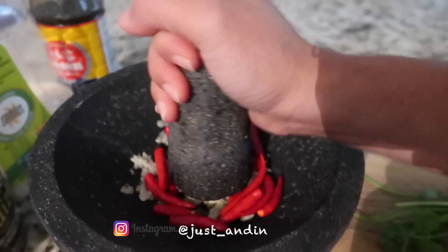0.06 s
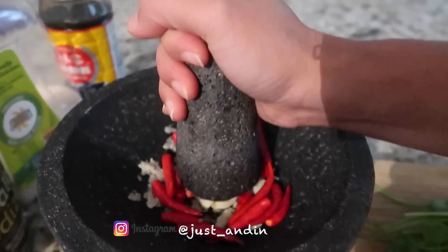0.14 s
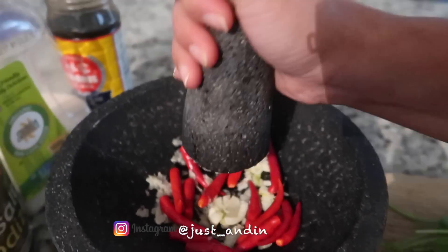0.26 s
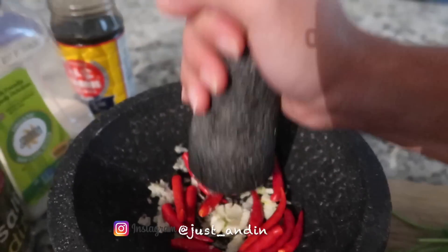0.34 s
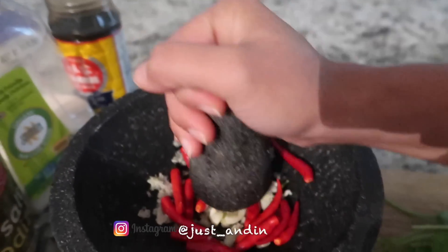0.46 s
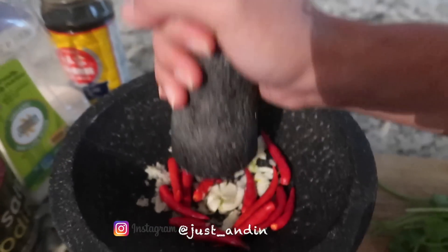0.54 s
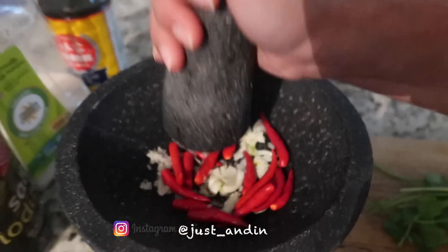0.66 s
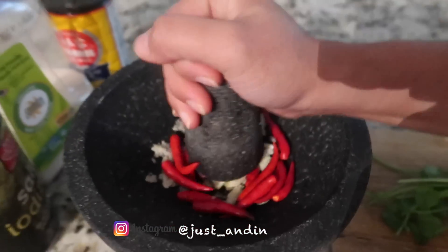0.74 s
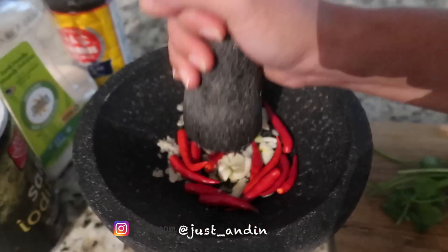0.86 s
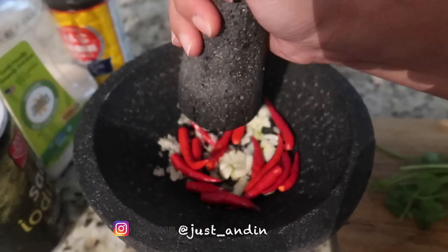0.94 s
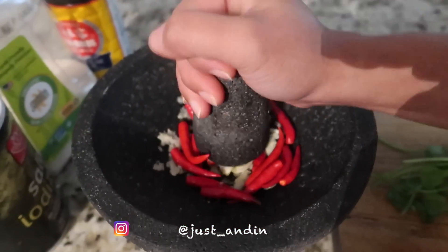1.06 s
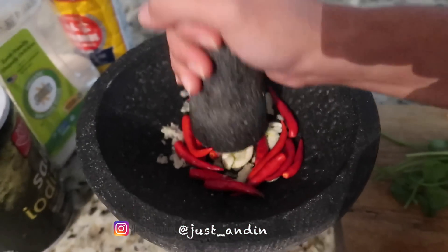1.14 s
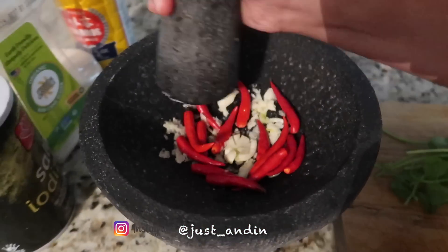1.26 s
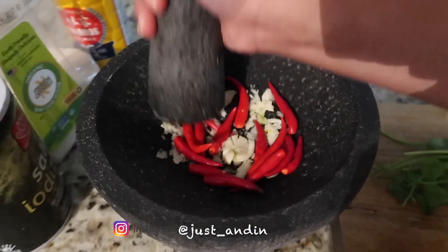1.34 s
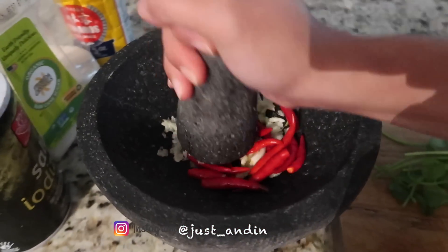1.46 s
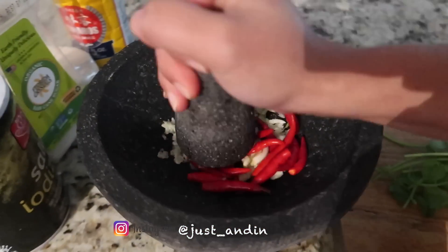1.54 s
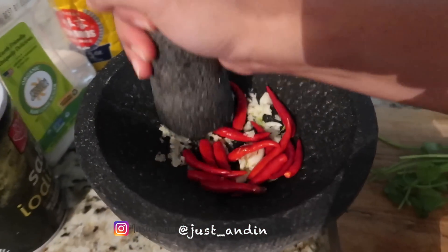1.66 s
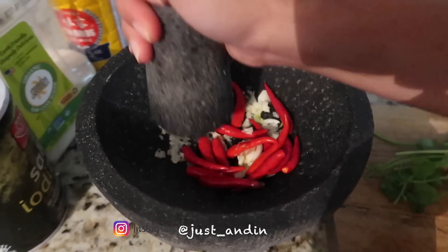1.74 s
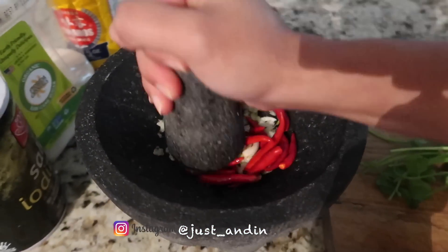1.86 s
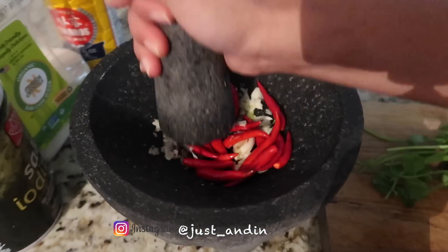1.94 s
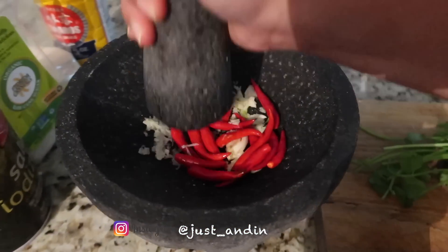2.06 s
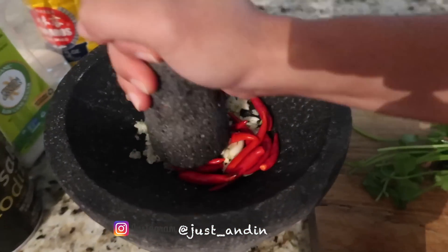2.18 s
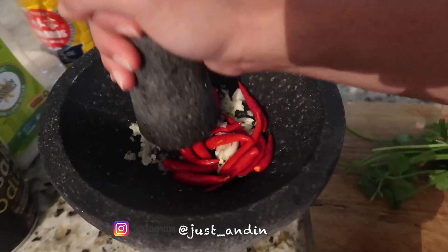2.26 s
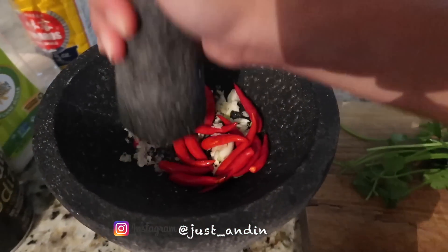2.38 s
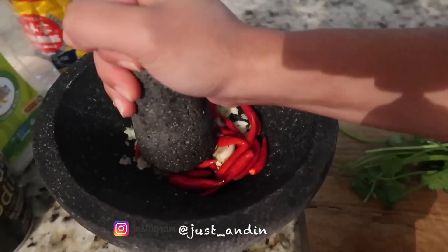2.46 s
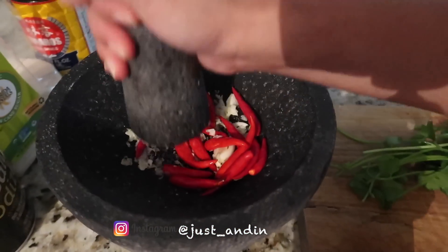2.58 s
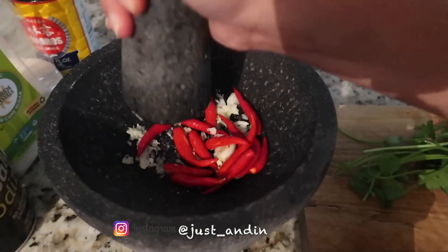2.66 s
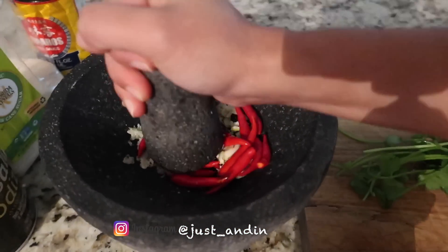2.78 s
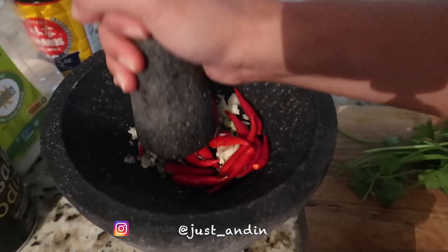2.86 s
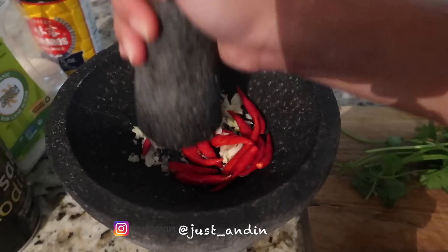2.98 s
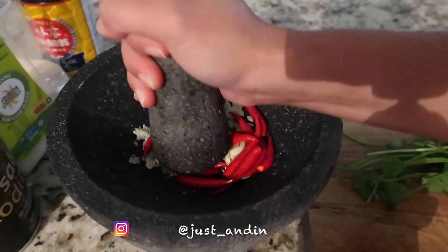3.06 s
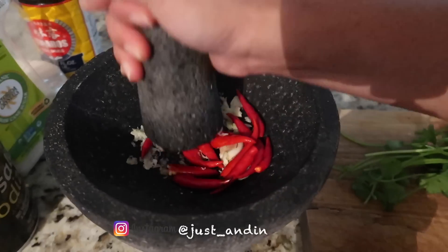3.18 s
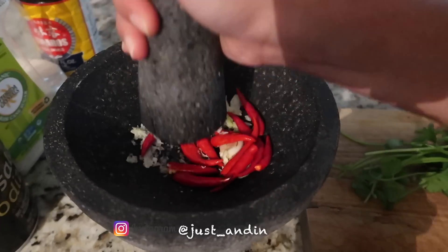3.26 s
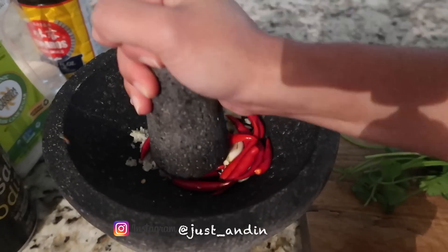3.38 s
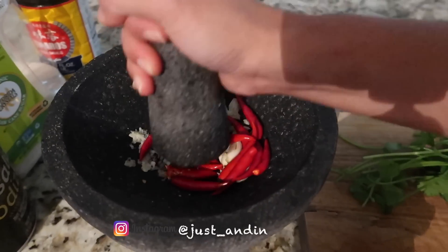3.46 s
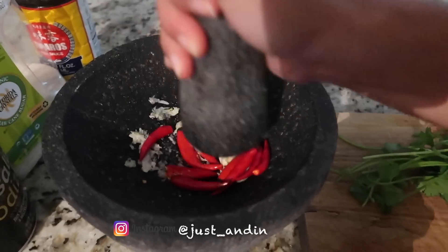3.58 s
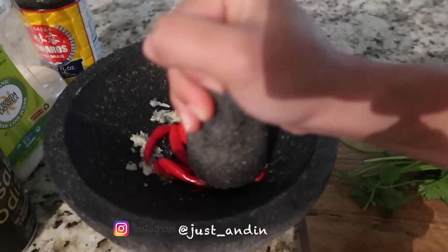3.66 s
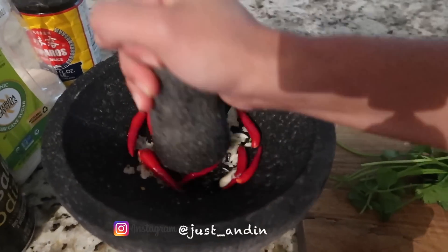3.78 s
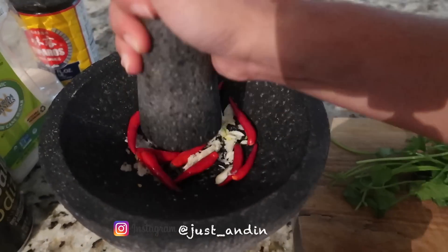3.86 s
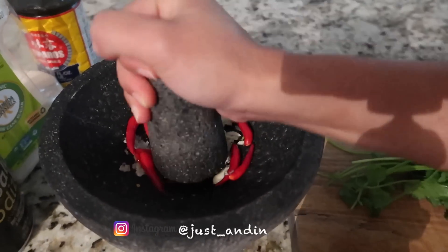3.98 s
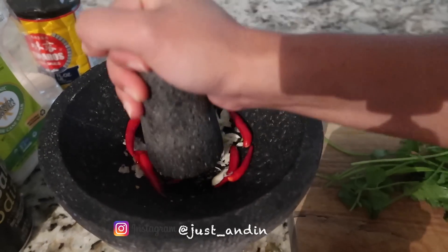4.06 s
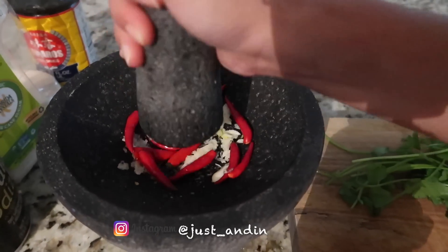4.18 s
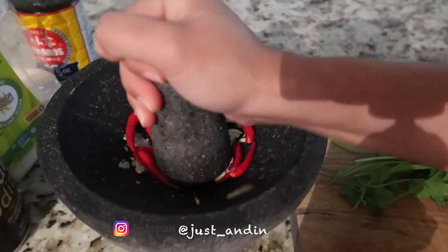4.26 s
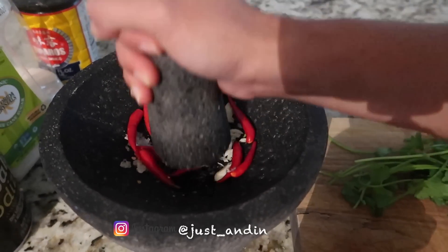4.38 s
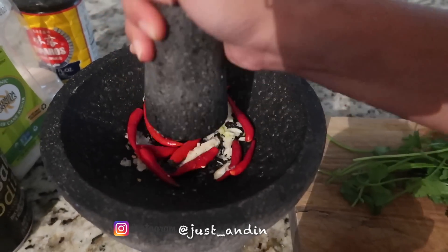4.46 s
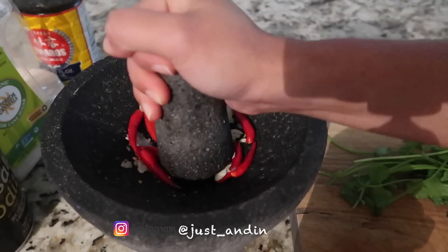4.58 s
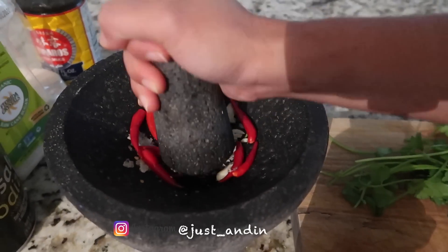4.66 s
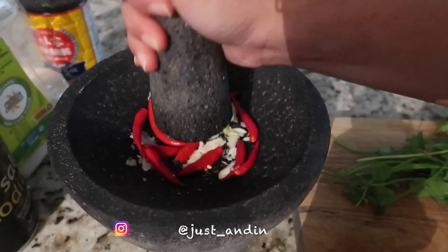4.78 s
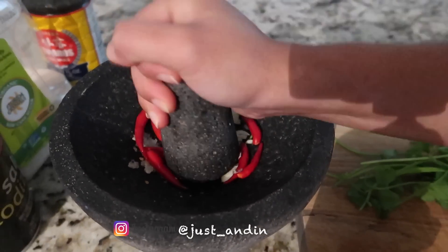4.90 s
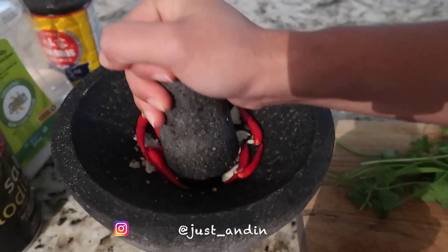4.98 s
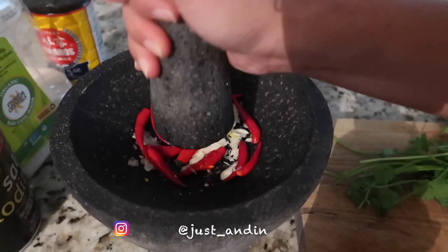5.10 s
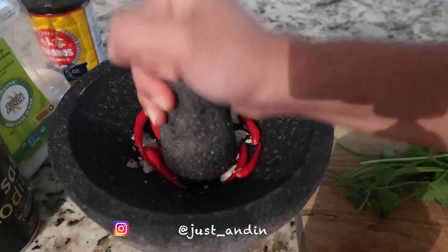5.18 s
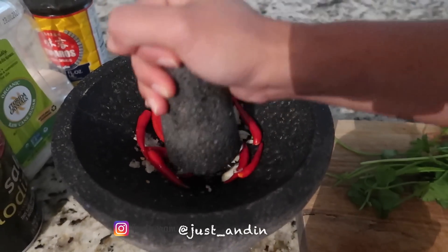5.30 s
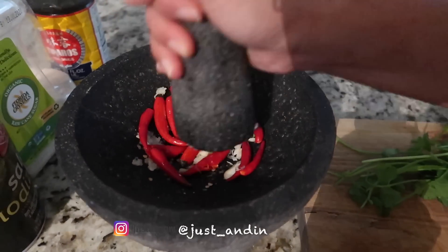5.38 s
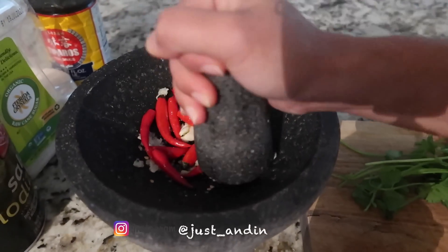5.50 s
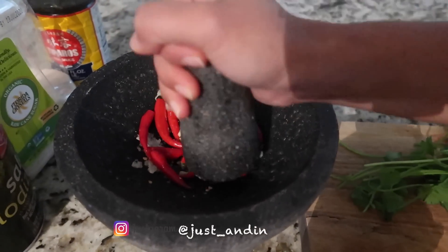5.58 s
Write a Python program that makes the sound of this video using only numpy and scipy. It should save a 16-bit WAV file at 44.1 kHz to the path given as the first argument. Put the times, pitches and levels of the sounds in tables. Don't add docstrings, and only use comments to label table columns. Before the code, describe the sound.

A stone pestle pounds chilies and garlic in a stone mortar, close to a phone in a hard, echoing kitchen. From about 0.2 s, blows come roughly every 0.3 s, each a quick crackle of bursting skins followed by a dull, heavy thud and low counter ring. Dull scrapes rub farther away at 0.7 s, with a faintly ringing drag. At 1.5 s the blow is very weak and gives way to bright crunching and tiny snaps; pounding resumes at 1.9 s with a soft board bump. Even, strong blows run until 3.4 s. At 3.75 s the mortar slaps its board loudly, a woody, rattling knock, with brief crunching around it. Blows continue, with a sharp snap at 4.4 s and the hardest, slightly clipped hits at 5.0 and 5.3 s. A final softer blow and firm board knock land at 5.6 s. Faint household murmur and fridge hum persist.

```python
import sys
import numpy as np
from scipy import signal
from scipy.fft import rfft, irfft, next_fast_len
from scipy.io import wavfile
from scipy.ndimage import uniform_filter1d, map_coordinates

SR = 44100
rng = np.random.default_rng(int(sys.argv[2]) if len(sys.argv) > 2 else 0)


def waveform_to_disk(signal):
    frames = np.transpose(np.atleast_2d(signal))
    scaled = np.clip(frames, -1, 1) * 32767
    samples = np.round(scaled).astype(np.int16)
    wavfile.write(sys.argv[1], SR, samples)


def how_loud(loudness_db):
    steps = np.asarray(loudness_db, float) / 20
    return 10 ** steps


N = 248724


def along(points, hz, column=1):
    rows = np.transpose(points)
    return np.interp(np.log(hz + 1), np.log(rows[0] + 1), rows[column])


def unit(x):
    return x / np.sqrt(np.mean(x ** 2) + 1e-20)


def filtered(x, response):
    size = next_fast_len(N + SR)
    return irfft(rfft(x, size) * response(np.fft.rfftfreq(size, 1 / SR)), size)[..., :N]


def modes(peaks):
    def response(f):
        total = 0
        for k, (hz, width, db) in enumerate(peaks):
            damping = 1j * f * width
            total = total + (-1) ** k * how_loud(db) * damping / (hz * hz - f * f + damping)
        return total
    return response


def swell(s, db, rise, fade):
    late = np.arange(N) / SR - s
    return how_loud(db - 20 * np.where(late < 0, -late / rise, late / fade))


def grains(s, db, hz, cycles):
    t = np.arange(200) / SR
    u = hz[:, None] * t / cycles
    wave = how_loud(db)[:, None] * np.sin(2 * np.pi * hz[:, None] * t) * u * np.exp(1 - u)
    at = np.round(s * SR).astype(int)[:, None] + np.arange(len(t))
    return np.bincount(at.ravel(), wave.ravel(), N + SR)[:N]


# pitch_hz [Hz], likeness [1 = the same]
LIKENESS = [(100, 1), (500, 0.97), (2000, 0.88), (4000, 0.6), (8000, 0.11), (13000, 0.097)]


def spread(pair):
    def shares(hz):
        turn = np.arccos(np.clip(along(LIKENESS, hz), 0, 1)) / 2
        return np.array([np.cos(turn), np.sin(turn)])
    mid, side = filtered(pair, shares)
    return np.array([mid + side, mid - side])


# start_s [s], thud_db [dB], contact_ms [ms], counter_db [dB], echo_db [dB]
BLOWS = [(0.158, -3.5, 2.14, 1, -0.5), (0.491, -11.5, 2.7, 3.5, 10), (0.839, -8.5, 3.13, 2, 2),
         (1.151, -6.5, 2.13, 2.5, 5), (1.471, -32, 1.3, 0, 11.5), (1.918, -12, 4.5, 2, 15.5),
         (2.229, -3.5, 2.63, -0.5, 7.5), (2.53, -5.5, 2.36, -0.5, 5), (2.841, -2, 1.67, -2, 5),
         (3.133, -5, 2.12, 1, 12), (3.434, -2, 1.85, -0.8, 8.5), (3.751, -12.5, 2.84, -6, 16),
         (4.083, -14, 4.1, 2, 4.5), (4.364, -11.5, 2.43, -1, 2), (4.658, -7, 1.72, 0.3, 6.5),
         (5.007, -0.2, 1.16, -3, 2.5), (5.297, 1, 0.99, -4.5, 0.7), (5.595, -8, 2.2, -0.5, 15.5)]
# pitch_hz [Hz], level_db [dB], decay_t60_s [s]
COUNTER_MODES = [(37.4, -14, 0.96), (61.4, -29, 0.89), (71.6, -17.5, 0.75), (98.8, -32, 1),
                 (118.5, -22, 0.81), (133, -15, 0.68), (156.2, -15.5, 0.67), (153.6, -31, 0.14),
                 (177.5, -14, 0.59), (200.8, -24.5, 0.33), (252.8, -19, 1), (299.4, -22, 0.76),
                 (406, -35, 0.34), (469, -18, 0.77), (641.5, -11.5, 0.6)]


def thuds():
    push, load, far, deep = np.zeros((4, N + SR))
    t = np.arange(-400, 400) / SR
    weight_db = 1.75
    for s, db, contact_ms, counter_db, echo_db in BLOWS:
        u = t / (0.00046 * contact_ms)
        dip = how_loud(db + 4) * np.exp(-np.abs(u) ** 1.25)
        squeeze = 0.31 * how_loud(db + 5) * np.exp(-(u + 2.45) ** 2 / 2)
        at = round((s + 0.0019) * SR) - 400
        push[at:][:len(t)] += squeeze - dip
        far[at:][:len(t)] -= how_loud(echo_db) * (dip - squeeze)
        load[at + 180:][:len(t)] -= how_loud(counter_db) * dip
        deep[at + 180:][:len(t)] -= how_loud(counter_db + weight_db) * dip
    bounce = 0.74 * push[:N] + filtered(push[:N], modes([(109.7, 43.3, 0.71)]))
    ring = [(hz, 2.9 / t60, db + 22.5) for hz, db, t60 in COUNTER_MODES]
    lowest = filtered(deep[:N], modes(ring[:3]))
    higher = filtered(load[:N], modes(ring[3:]))
    return bounce + lowest - higher, far[:N]


# start_s [s], peak_db [dB], tilt_db [dB per octave], stone_knock_db [dB], strongest_hz [Hz]
BURSTS = [(0.155, -5, -4.5, -1, 3530), (0.4843, -12, 0.2, 13, 2680), (0.8354, -1.5, -9.5, -6, 4520),
          (1.1475, -1.5, -4.5, -1, 5300), (1.4649, -23, 3.5, 8, 7330), (1.915, -8, 1.5, 8.5, 5100),
          (2.2245, -9.5, 0, 1.5, 4600), (2.5272, 1, 0.5, 9, 3080), (2.8368, -3.5, -5.5, -5.5, 6240),
          (3.1297, -8.5, 0.3, 5.5, 3300), (3.4297, -7, 1.5, 5.5, 2940), (3.742, -23, 0, -2, 2740),
          (4.077, -16.5, -1.5, -12, 4000), (4.3626, -0.7, -7.5, -3, 3440), (4.654, -17, -1.5, -1.5, 3120),
          (5.0041, -11.5, -2.5, 10.5, 3350), (5.295, -2.5, -2, 14.5, 3950), (5.5903, -21, -3, -8, 1870)]
# pitch_hz [Hz], level_db [dB per Hz]
CRACK_COLOUR = [(470, -56), (800, -5.5), (1240, -7.5), (1770, -13.5), (2170, -10.5), (3290, -1.5),
                (4180, -3), (4690, -3.5), (6430, -4), (7020, -4), (8170, -5), (9150, -8), (12500, -12),
                (14600, -18), (16400, -26.5)]
# pitch_hz [Hz], width_hz [Hz], level_db [dB]
BOWL_RING = [(3210, 30, -9.5), (3850, 35, -14), (5100, 45, -13), (6400, 45, -12)]


def cracks():
    near, far = np.zeros((2, N + SR))
    t = np.arange(-512, 512) / SR
    hz = np.fft.rfftfreq(len(t), 1 / SR)
    for s, db, tilt_db, knock_db, best_hz in BURSTS:
        ms = 2.6 - 0.1327 * db
        tilt = tilt_db * np.log2(hz / 4000 + 0.4)
        knock = knock_db / (1 + (hz / 1700) ** 6)
        colour = how_loud(along(CRACK_COLOUR, hz) + tilt + knock)
        colour *= 1 + 0.54 * np.exp(-(np.log2(hz / best_hz + 0.0011) / 0.12) ** 2)
        rise = np.abs(t / (0.00069 * ms)) ** 1.5
        fall = np.abs(t / (0.00038 * ms)) ** 1.23
        envelope = np.exp(-np.where(t < 0, rise, fall))
        grit = rng.standard_normal(len(t)) * how_loud(8.2 * rng.standard_normal(len(t)))
        at = round((s + 0.0008 * ms) * SR) - 512
        near[at:][:len(t)] += how_loud(db - 7) * envelope * unit(irfft(rfft(grit) * colour))
        puff = np.roll(irfft(colour), 512)
        far[at:][:len(t)] += puff * how_loud(db - 6) * np.linalg.norm(envelope) / np.linalg.norm(puff)
    wall = filtered(np.pad(near, (310, 0))[:N], lambda f: 1 / (1 + 1j * f / 6000))
    return near[:N] + how_loud(-12) * wall + filtered(near[:N], modes(BOWL_RING)), far[:N]


# start_s [s], peak_db [dB], hardness_db [dB]
JOLTS = [
    (1.921, -8, -5),
    (3.769, 8, 6),
    (5.613, 1.5, 1),
]
# pitch_hz [Hz], width_hz [Hz], level_db [dB]
BOARD_KNOCK = [(440, 110, -5), (590, 155, 0.5), (931, 99, 4.5), (1182, 125, 0.5), (1507, 79, -4),
               (1890, 164, -8), (2720, 140, -11), (3900, 1200, -21.5)]
# pitch_hz [Hz], width_hz [Hz], level_db [dB]
BOARD_RING = [(619, 17, -27), (930, 37, 5), (1080, 36, 12), (1440, 38, 8), (1870, 28, -23), (2090, 47, -32),
              (2720, 34, -5)]
# delay_ms [ms], share [of the first slap, negative = inverted]
EARLY_ECHOES = [(1.9, 0.32), (4.3, 0.38), (6.6, 0.26), (8.6, -0.34), (11.5, 0.25), (16.5, -0.18), (18.5, 0.17)]


def jolts():
    slap = np.zeros(N + SR)
    t = np.arange(40) / SR
    for s, db, hard_db in JOLTS:
        width_s = 0.00015 * how_loud(-hard_db)
        slap[round(s * SR):][:len(t)] += how_loud(db + 8.5) * np.exp(-(t - 0.0003) ** 2 / width_s ** 2)
    first = filtered(slap[:N], modes(BOARD_KNOCK))

    def echoed(hz):
        return 1 + sum(share * np.exp(-2j * np.pi * hz * ms / 1000) for ms, share in EARLY_ECHOES)
    return filtered(first, echoed) + how_loud(-6.5) * filtered(slap[:N], modes(BOARD_RING)), first


# start_s [s], peak_db [dB], pitch_hz [Hz]
SNAPS = [(1.1487, -0.5, 4950), (1.538, -22.5, 6200), (1.5462, -22, 6900), (1.5646, -23.5, 7340),
         (1.5738, -24, 7500), (1.5882, -20.5, 7700), (1.6152, -28, 6750), (1.6347, -38, 3800),
         (1.6777, -28.5, 4440), (1.9087, -29, 3560), (1.9157, -0.8, 5380), (1.9236, -15.5, 4500),
         (3.717, -42, 2980), (3.7694, -12, 2720), (3.8184, -28, 2680), (3.8844, -42, 2730),
         (4.3625, 6, 3750), (4.4254, -18.5, 3280), (4.4265, -11.5, 9460), (4.4265, -15, 12400)]


def snaps():
    s, db, hz = np.transpose(SNAPS)
    return grains(s, db, hz, cycles=0.8)


# peak_s [s], level_db [dB], rise_s [s], fade_s [s], centre_hz [Hz]
CRUNCH = [
    (1.467, -34, .008, .08, 5500),
    (1.572, -39.5, .13, .13, 6640),
    (1.676, -48, 0.012, 0.15, 4670),
    (3.748, -40, .045, 0.06, 7100),
    (3.844, -43.5, .12, 0.042, 6800),
]


def crunch():
    out, count = np.zeros(N), 1800
    for s, db, rise, fade, centre_hz in CRUNCH:
        span = 2 * (rise + fade)
        at = s - 2 * rise + span * rng.uniform(0, 1, count)
        hz = np.clip(centre_hz * np.exp(0.38 * rng.standard_normal(count)), 1500, 15000)
        size_db = 2.74 * rng.exponential(1, count) - 9.5
        out += np.sqrt(8 * span) * swell(s, db, rise, fade) * grains(at, size_db, hz, cycles=1.0)
    return out


# peak_s [s], level_db [dB], rise_s [s], fade_s [s]
DULL_SCRAPES = [
    (0.661, -26.5, 0.035, 0.15),
    (.85, -36.5, 0.29, .22),
    (1.562, -31, 0.037, 0.42),
    (2.375, -29, 0.014, 0.15),
    (4.339, -26, .004, 0.058),
    (5.562, -31.5, .012, 0.11),
]
# peak_s [s], level_db [dB], rise_s [s], fade_s [s]
RINGING_DRAG = [
    (0.757, -36.5, 0.014, 0.13),
    (.805, -34.5, 0.082, 0.3),
]
# pitch_hz [Hz], width_hz [Hz], level_db [dB]
DRAG_MODES = [(895, 50, 0), (1270, 60, -5), (1770, 50, -1), (2660, 80, -8)]


def scrape():
    def soft(hz):
        return 1 / (1 + (hz / 4500) ** 4) ** 2

    def dull_colour(hz):
        return soft(hz) * modes([(700, 600, 0), (1500, 900, -1)])(hz)

    def ringing_colour(hz):
        return soft(hz) * (np.abs(modes(DRAG_MODES)(hz)) + how_loud(-12) * hz / (hz + 900))
    dull = filtered(rng.standard_normal((2, N)), dull_colour)
    ringing = filtered(rng.standard_normal((2, N)), ringing_colour)
    dull_gain = how_loud(-12.5) * sum(swell(*row) for row in DULL_SCRAPES)
    ringing_gain = sum(swell(*row) for row in RINGING_DRAG)
    return dull_gain * spread(unit(dull)) + ringing_gain * spread(unit(ringing))


# pitch_hz [Hz], decay_t60_s [s], level_db [dB]
KITCHEN_ECHO = [(183, 0.53, -20), (415, 0.37, -7.5), (640, 0.48, -5), (966, 0.58, -12), (1580, 0.71, -8.5),
                (2400, 0.55, -14), (4520, 0.69, -15.5), (7440, 0.52, -15.5), (11900, 0.4, -18),
                (13750, 0.09, -43)]


def kitchen(x):
    hz, t, z = signal.stft(rng.standard_normal((2, SR)), SR, nperseg=256)
    t60 = along(KITCHEN_ECHO, hz)[:, None]
    level_db = along(KITCHEN_ECHO, hz, column=2)[:, None]
    lumps = uniform_filter1d(uniform_filter1d(rng.standard_normal(z.shape[1:]), 5, 0), 6, 1)
    early = 1 + how_loud(-7.5 - 60 * t / 0.04)
    decay = how_loud(level_db - 60 * t / t60) / np.sqrt(t60 * SR * 0.079)
    tail = signal.istft(z * how_loud(2.98 * unit(lumps)) * early * decay, SR, nperseg=256)[1]
    wet = signal.fftconvolve(np.pad(x, (350, 0))[None], tail, axes=1)[:, :N]
    return spread(filtered(wet, lambda f: f ** 4 / (f ** 4 + 220 ** 4)))


# pitch_hz [Hz], level_db [dB]
FRIDGE_TONES = [(119.5, -67.5), (238, -52)]


def fridge():
    t = np.arange(N) / SR
    knots = rng.standard_normal((2, 120))
    drift = map_coordinates(knots, [np.repeat([[0], [1]], N, 1), np.tile(t * 14, (2, 1))])
    out = np.zeros(N)
    for (hz, db), d in zip(FRIDGE_TONES, drift):
        out += how_loud(db + 2.1 * d) * np.sin(2 * np.pi * hz * t + 1.26 * d)
    return out


# pitch_hz [Hz], level_db [dB]
AIR_COLOUR = [(15, -38), (38, 4.5), (60, -2), (120, -8.5), (240, -4), (400, -5.5), (700, -6), (1200, -6.5),
              (2200, -13), (4500, -22.5), (8000, -28.5), (11500, -35.5), (13000, -75), (16000, -91.5)]


def background():
    z = signal.stft(rng.standard_normal((2, N)), nperseg=512)[2]
    patches = uniform_filter1d(uniform_filter1d(rng.standard_normal(z.shape[1:]), 6, 0), 12, 1)
    pair = signal.istft(z * how_loud(1.75 * unit(patches)), nperseg=512)[1][:, :N]
    air = spread(filtered(pair, lambda hz: how_loud(along(AIR_COLOUR, hz))))
    rumble = filtered(air, lambda hz: 1 / (1 + (hz / 350) ** 4))
    t = np.arange(N) / SR
    s, db = np.transpose(BLOWS)[:2]
    last = np.searchsorted(s, t) - 1
    since = np.where(last < 0, 1, t - s[last])
    murmur_gain = how_loud(-50.5 - 1.5 * np.exp(-since / 0.45))
    rise_s, fade_s = 0.088, 0.093
    late = since - rise_s
    shake = how_loud(db[last] - 30.5 - 20 * np.where(late < 0, -late / rise_s, late / fade_s))
    return murmur_gain * unit(air - rumble) + (how_loud(-44) + shake) * unit(rumble)


def scene():
    thud, thump = thuds()
    board, slap = jolts()
    burst, puff = cracks()
    small = snaps() + crunch()
    crisp = burst + small
    out_of_step = filtered(crisp, lambda hz: 1j * (0.041 + hz / 14000))
    near = thud + board + spread(np.array([crisp, out_of_step]))
    echo = kitchen(thump + puff + how_loud(6.5) * slap) + kitchen(small)
    return near + echo + scrape() + background() + fridge()


def low_pass(x):
    return signal.sosfilt(signal.butter(12, 16510, fs=SR, output="sos"), x)


def record(dry):
    heard = filtered(dry, lambda hz: (1j * hz / (26 + 1j * hz)) ** 4 / (1 + (hz / 15500) ** 12))
    clipped = heard / (1 + np.abs(heard / 1.02) ** 8) ** (1 / 8)
    return low_pass(clipped)


dry = scene()
out = record(dry)
waveform_to_disk(out)
```